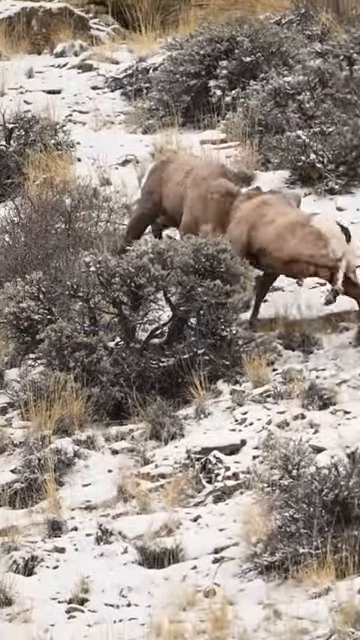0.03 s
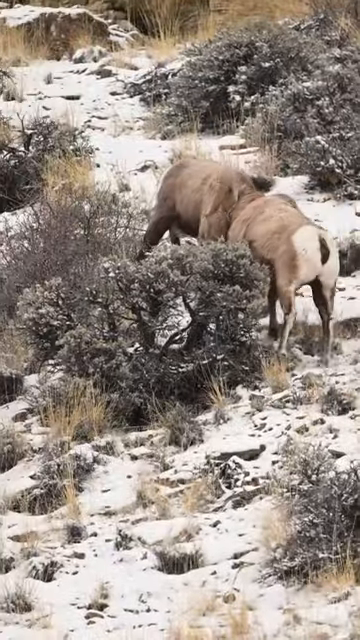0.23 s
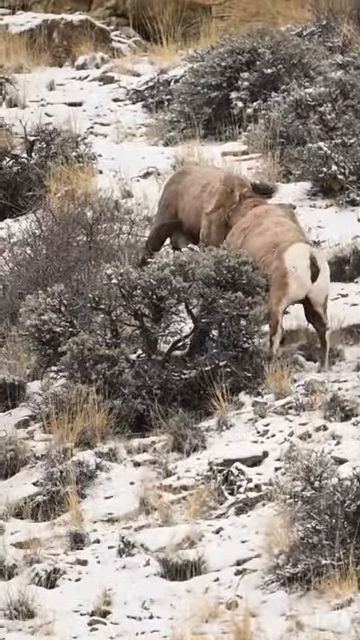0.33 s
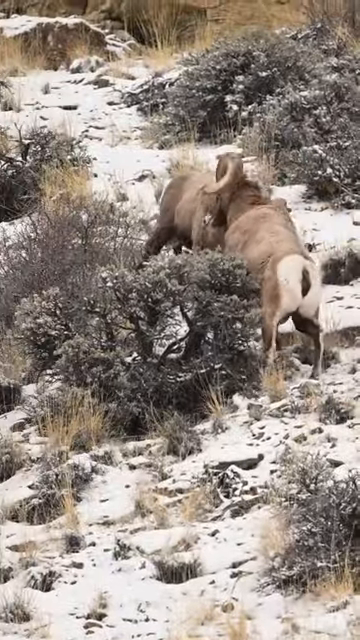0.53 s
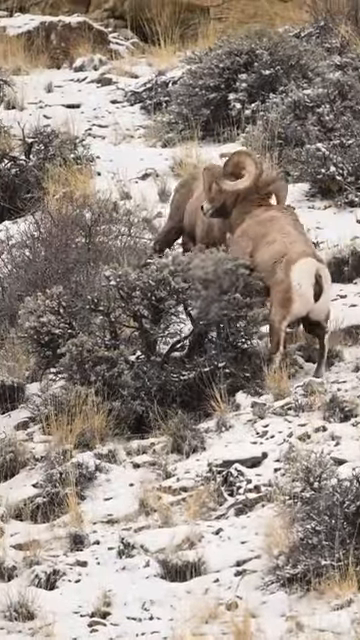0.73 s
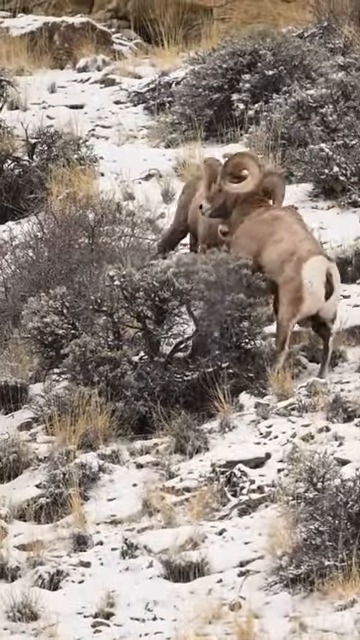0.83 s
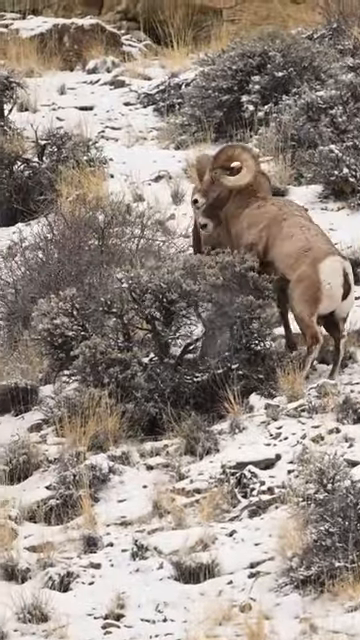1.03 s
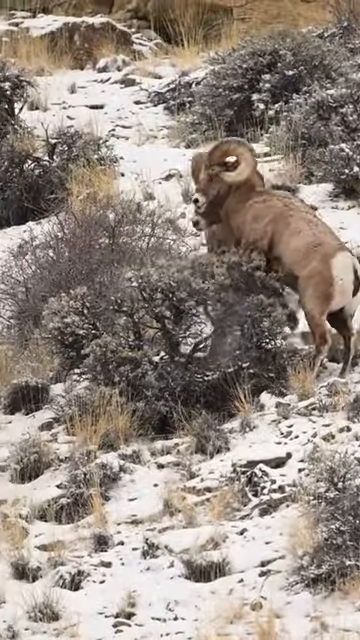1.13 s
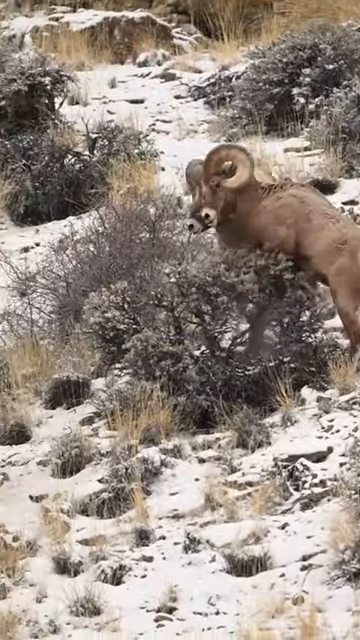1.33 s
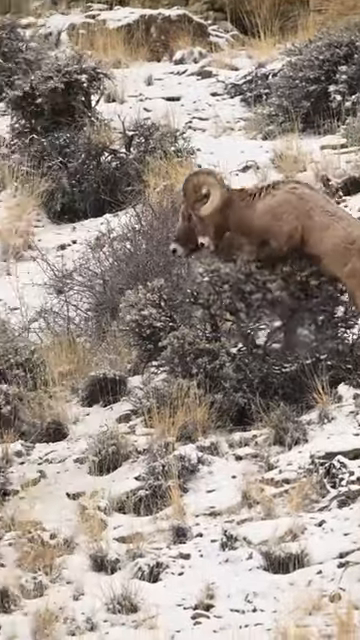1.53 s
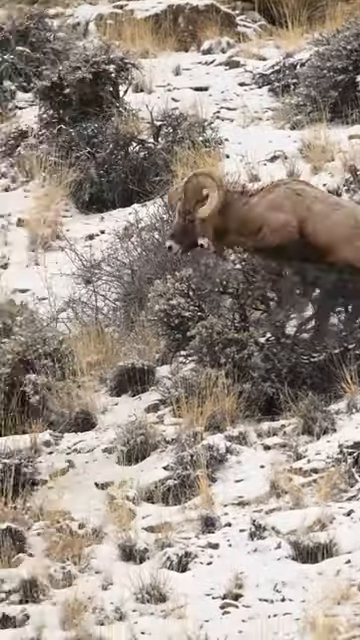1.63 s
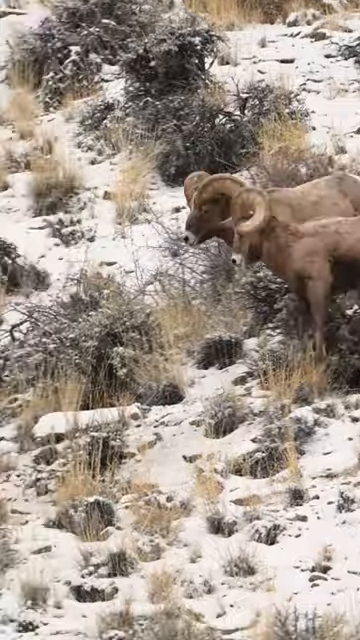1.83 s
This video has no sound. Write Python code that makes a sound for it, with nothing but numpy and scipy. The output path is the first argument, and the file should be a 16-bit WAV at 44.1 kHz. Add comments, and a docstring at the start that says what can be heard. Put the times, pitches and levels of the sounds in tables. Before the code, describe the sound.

Two rams clash horns in one sharp double crack that echoes off an open, snowy hillside. A soft knock follows, then faint hoof thuds, rustling brush and snapping twigs that grow busier, heard from one spot on the slope.

```python
"""Brush rustles faintly in the quiet air of a snowy hillside, then two rams butt heads. The horns meet
in a double crack that the nearby banks throw back, then knock once more, softly; a far slope answers
almost a second later. Hooves thud and crunch in the snow, and twigs snap as one ram pushes through
a bush. Heard in mono, from one spot on the hill."""
import sys
import numpy as np
from scipy import signal
from scipy.fft import rfft, irfft, next_fast_len
from scipy.io import wavfile

SR = 44100
rng = np.random.default_rng(int(sys.argv[2]) if len(sys.argv) > 2 else 0)


def unload_wav(signal):
    """Save mono or channel-first audio to the path in sys.argv[1] as 16-bit WAV at rate SR, clipped to [-1, 1]."""
    wavfile.write(
        sys.argv[1],
        SR,
        np.round(np.clip(np.atleast_2d(signal).T, -1, 1) * 32767).astype(np.int16),
    )


N = 83790
T = np.arange(N) / SR
GROUND_DELAY_S, GROUND_GAIN = 0.00217, 0.26  # the bounce off the ground on the way to the microphone


def from_db(db):
    """Decibels to gain."""
    return 10 ** (np.asarray(db) / 20)


def rms_one(x):
    """Scale to rms 1."""
    return x / np.sqrt(np.mean(x ** 2) + 1e-20)


def curve(rows):
    """Gain over time from rows of time_s, level_db."""
    return from_db(np.interp(T, *np.transpose(rows)))


def butter(x, hz, kind, order=2):
    """Butterworth low- or high-pass."""
    return signal.sosfilt(signal.butter(order, min(hz, .45 * SR), kind, fs=SR, output="sos"), x + 1e-18)


def colour(x, points):
    """Causal (minimum-phase) filter from rows of frequency_hz, gain_db."""
    size = next_fast_len(2 * len(x))
    size += size % 2
    hz, db = np.transpose(points)
    grid_hz = np.maximum(np.arange(size // 2 + 1) * SR / size, 1)
    gain = from_db(np.interp(np.log(grid_hz), np.log(hz), db))
    cepstrum = irfft(np.log(gain))
    cepstrum[1:size // 2] *= 2
    cepstrum[size // 2 + 1:] = 0
    return irfft(rfft(x, size) * np.exp(rfft(cepstrum)))[:len(x)]


def delayed(x, start_s):
    """The sound x starting start_s seconds in."""
    return np.interp(np.arange(N) - start_s * SR, np.arange(len(x)), x, left=0, right=0)


def burst(t60_s, size=4096):
    """A dying puff of noise."""
    return rng.standard_normal(size) * from_db(-60 * T[:size] / t60_s)


def air(level_db=-65):
    """Quiet open air: steady noise, strongest in the bass."""
    # Spectrum of the air: frequency_hz, gain_db
    spectrum = [(20, 0.5), (40, 0), (120, -1), (200, -4), (400, -7), (750, -9), (1200, -14.5), (3000, -19),
                (6000, -21), (15500, -24.5)]
    return from_db(level_db) * rms_one(colour(rng.standard_normal(N), spectrum))


def rustle(ticks_per_s=1800, spread_db=3.5):
    """Dry stems brush against coats and legs in a stream of tiny ticks, doubled by the ground."""
    # Loudness of the moving brush: time_s, level_db
    levels = [(0, -71), (.5, -78.5), (.57, -66), (.7, -74.5), (.85, -74), (1.05, -72), (1.15, -70),
              (1.28, -72.5), (1.36, -70.5), (1.55, -68), (1.71, -65.5), (1.79, -64.5), (1.85, -61),
              (1.9, -63)]
    # Spectrum of the dry stems: frequency_hz, gain_db
    spectrum = [(300, -25), (600, -6.5), (850, 3.5), (1300, 6), (2000, 4), (4000, 1), (5500, -8.5),
                (8000, -10.5), (15000, -23.5)]
    ticks = (rng.random(N) < ticks_per_s / SR) * rng.choice([-1, 1], N)
    ticks = ticks * from_db(spread_db * np.minimum(rng.exponential(1, N), 4))
    bounce = GROUND_GAIN * delayed(ticks, GROUND_DELAY_S)
    return curve(levels) * rms_one(colour(ticks + bounce, spectrum))


def horns(low_cut_hz=252, edge_ratio=2.27):
    """Each contact rings the damped horns and skulls; the ridges grind with a short crack."""
    # Horn contacts, brighter when harder: start_s, ring_db, hardness_hz, crack_db
    contacts = [(0.23036, -15, 1260, -64), (0.23306, -18, 1350, -62), (0.23946, -14, 1044, -26.5),
                (0.24205, -13.5, 3000, -26), (0.24433, -19.5, 3300, -25), (0.5194, -36.5, 1000, -63),
                (0.5285, -49.5, 450, -77.5)]
    # Modes of horns and skulls: pitch_hz, level_db, t60_s
    modes = [(243, -16, 0.085), (328.4, -14.5, 0.068), (420.3, -8, 0.045), (639.3, -1.5, 0.034),
             (724, -5, 0.071), (846, -10, 0.022), (1160, -10, 0.015), (1430, -6, 0.0072),
             (1750, -15, 0.014), (1960, -12.5, 0.027), (2341, -8.5, 0.016), (2900, -14, 0.026),
             (3270, -16, 0.02), (3700, -22.5, 0.016)]
    # Spectrum of the gritty crack: frequency_hz, gain_db
    crack_spectrum = [(90, -43), (300, -27), (1200, -14), (2800, -1), (4400, 3.5), (5500, -19),
                      (7000, -10.5), (10000, -21), (15000, -30.5)]
    t, out = T[:8192], 0
    ring = sum(from_db(db - 60 * t / t60_s) * np.sin(2 * np.pi * hz * t) for hz, db, t60_s in modes)
    ring = butter(ring, low_cut_hz, "high", order=4)
    for start_s, ring_db, hardness_hz, crack_db in contacts:
        knock = butter(ring, hardness_hz, "low")
        knock = butter(knock, edge_ratio * hardness_hz, "low", order=4)  # the spectrum ends steeply
        crack = colour(burst(t60_s=0.006), crack_spectrum)
        out += from_db(ring_db) * delayed(knock, start_s)
        out += from_db(crack_db) * delayed(crack, start_s)
    return out


def hillside(clash, far_delay_s=0.902, far_spread_s=0.053, far_top_hz=820):
    """Nearby banks echo, brush and rocks scatter a wash, and a far slope gives a dull answer."""
    # Distinct echoes off nearby banks: delay_s, level_db
    banks = [(.0595, -15), (.075, -11.5), (.0845, -15)]
    # Tone of the banks and the far slope: frequency_hz, gain_db
    echo_spectrum = [(200, -22), (430, -11.5), (640, -0.5), (900, -3), (1400, 0), (3000, -19), (8000, -23)]
    # Sound scattered back by brush and rocks: delay_s, level_db
    scatter_levels = [(.004, -39.5), (.04, -62.5), (.064, -49.5), (.081, -41.5), (.105, -54), (.135, -55),
                      (.16, -57.5), (.2, -70), (.26, -74), (.45, -73.5), (.7, -100)]
    # Tone of that scatter: frequency_hz, gain_db
    scatter_spectrum = [(150, 0), (310, -2), (430, -3.5), (540, 5), (680, -4), (1000, 5), (1500, -0.5),
                        (2200, 1.5), (4000, 3), (8000, -1), (15000, 0)]
    near = sum(from_db(db) * delayed(clash, delay_s) for delay_s, db in banks)
    scatter = colour(rng.standard_normal(N) * curve(scatter_levels), scatter_spectrum)
    wash = signal.fftconvolve(clash, scatter)[:N]
    far_swell = from_db(-67) * np.exp(-.5 * ((T - far_delay_s) / far_spread_s) ** 2)
    far = signal.fftconvolve(clash, rng.standard_normal(N) * far_swell)[:N]
    far += from_db(-31) * delayed(clash, start_s=.912)  # one distinct return within the smear
    return colour(near + butter(far, far_top_hz, "low"), echo_spectrum) + wash


def snaps(click_height=8.1, width_octaves=0.79, skirt_db=-14.5):
    """Each break is a click and brief splintering around its own pitch, doubled by the ground."""
    # Twigs and snow crust breaking: start_s, level_db, pitch_hz, t60_s
    breaks = [(0.3700, -45.5, 7460, .012), (0.4817, -39, 1630, .008), (0.5437, -43, 4570, .014),
              (0.546, -49, 4040, 0.018), (0.5615, -40, 4500, 0.018), (0.5700, -42.5, 7000, 0.029),
              (0.647, -45.5, 4130, .02), (0.7555, -48, 3500, .01), (0.9160, -41, 4500, 0.029),
              (1.1100, -51.5, 4500, .03), (1.203, -47.5, 3300, 0.01), (1.2165, -38.5, 4560, 0.017),
              (1.3392, -48.5, 1900, 0.021), (1.3660, -47.5, 2190, 0.024), (1.4040, -50.5, 2300, 0.015),
              (1.435, -48.5, 1720, 0.02), (1.5600, -47.5, 5000, 0.015), (1.5878, -48, 1500, 0.015),
              (1.6145, -49, 2490, .012), (1.621, -45.5, 4100, .014), (1.6470, -44, 3030, 0.012),
              (1.661, -51.5, 1760, 0.025), (1.687, -38.5, 1680, 0.026), (1.6874, -34.5, 3000, 0.0083),
              (1.7355, -43, 2720, 0.015), (1.7456, -45, 2080, 0.02), (1.7586, -38, 2660, 0.014),
              (1.7686, -32, 2600, 0.0074), (1.7735, -32.5, 2660, 0.016), (1.7928, -46, 1800, 0.016),
              (1.8043, -34, 2500, 0.0087), (1.8108, -41, 4970, 0.0076), (1.8209, -41, 2800, 0.041),
              (1.8276, -35, 2900, 0.014), (1.837, -39, 3570, 0.026), (1.8402, -31.5, 3440, 0.023),
              (1.873, -31.5, 2670, 0.019), (1.8828, -47.5, 1300, 0.021)]
    # Tone common to all snaps: frequency_hz, gain_db
    spectrum = [(200, -39), (550, -15), (850, 10.5), (1300, 4), (4000, -1), (5300, -9.5), (7500, -5),
                (15000, -17.5)]
    out, grid_hz = 0, np.geomspace(100, 16000, 24)
    for start_s, level_db, pitch_hz, t60_s in breaks:
        hump = np.exp(-.5 * (np.log2(grid_hz / pitch_hz) / width_octaves) ** 2)
        band = np.transpose([grid_hz, skirt_db * (1 - hump)])
        snap = colour(np.r_[click_height, burst(t60_s)], band)
        snap *= 0.14 * np.sqrt(t60_s * SR / np.sum(snap ** 2))  # energy in proportion to decay time
        out += from_db(level_db) * delayed(snap, start_s)
    bounce = GROUND_GAIN * delayed(out, GROUND_DELAY_S)
    return colour(out + bounce, spectrum)


def hooves():
    """Snow cushions each hoof fall to a thud of a few cycles."""
    # Hoof falls: start_s, peak_db, pitch_hz, length_s
    falls = [(0.801, -45, 423, 0.0074), (0.8075, -56, 300, 0.011), (1.257, -56.5, 111.5, .022),
             (1.635, -55, 138, 0.0208), (1.644, -51.5, 563, 0.0057)]
    out = 0
    for start_s, peak_db, pitch_hz, length_s in falls:
        swell = np.sin(np.pi * np.minimum(T / length_s, 1) ** 0.63)
        thud = swell * np.sin(2 * np.pi * pitch_hz * T)
        out += from_db(peak_db) * delayed(thud, start_s)
    return out


def scene():
    """Air, brush, the clash with its echoes and the footwork meet at one microphone."""
    clash = horns()
    return (air() + rustle() + clash + hillside(clash) + snaps() + hooves())[None]


def record(dry, cutoff_hz=15800):
    """The top of the treble is cut steeply."""
    return signal.sosfilt(signal.ellip(10, .1, 70, cutoff_hz, fs=SR, output="sos"), dry)


dry = scene()
out = record(dry)
unload_wav(out)
```